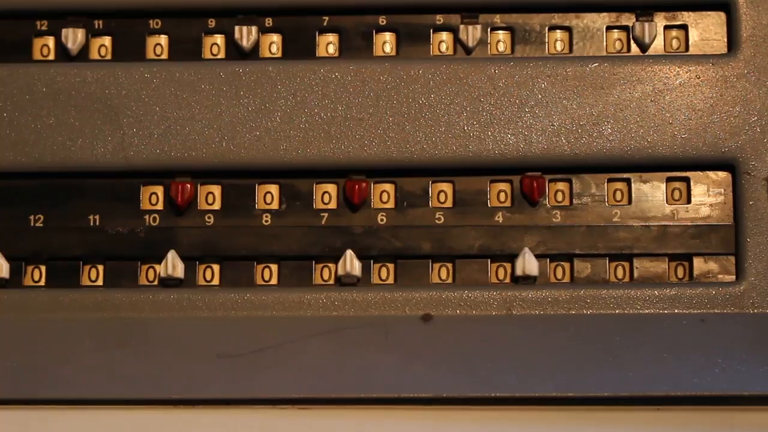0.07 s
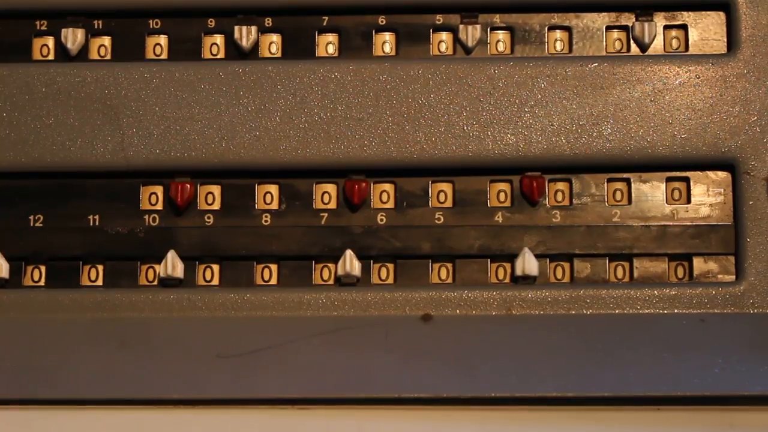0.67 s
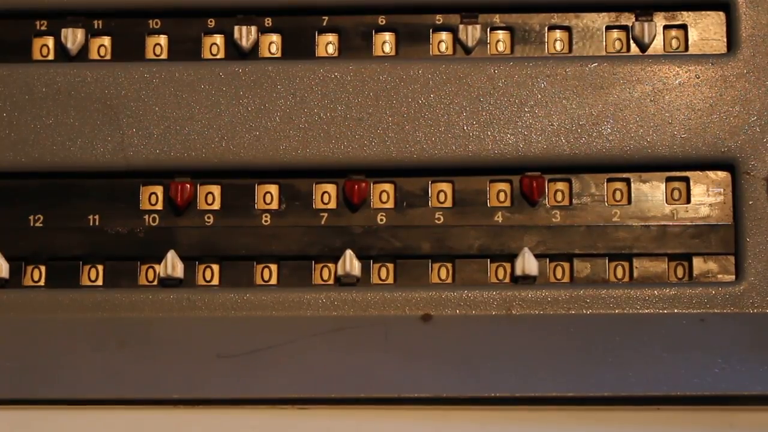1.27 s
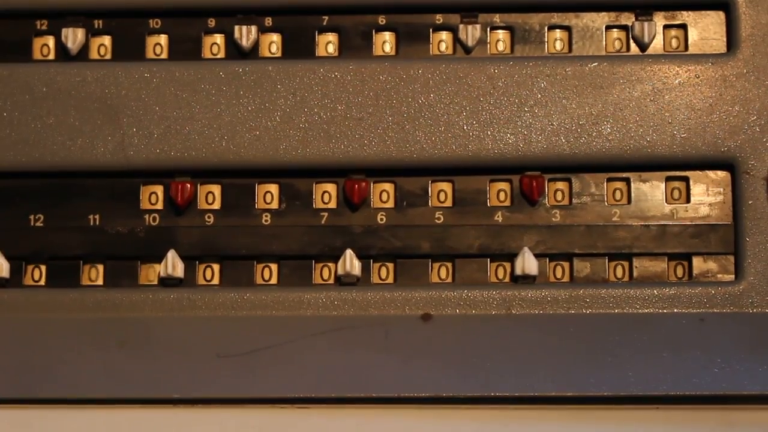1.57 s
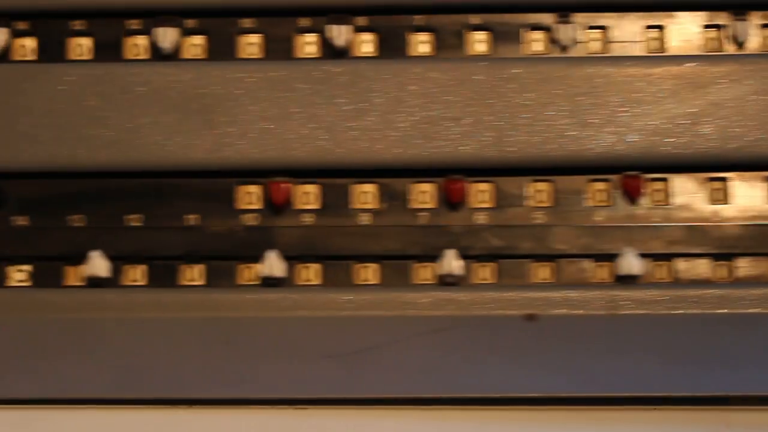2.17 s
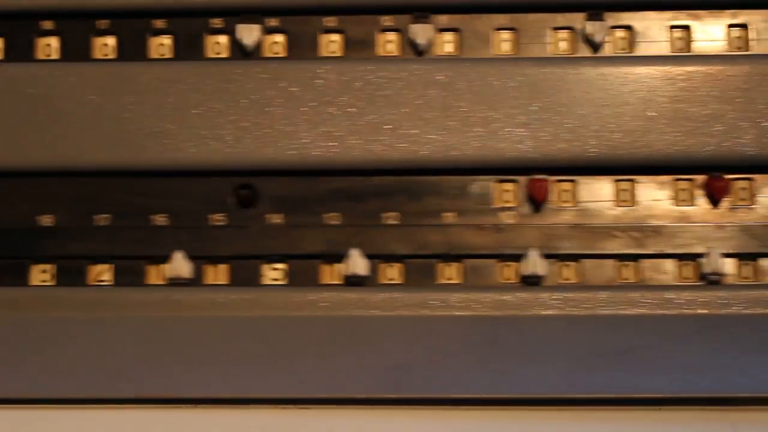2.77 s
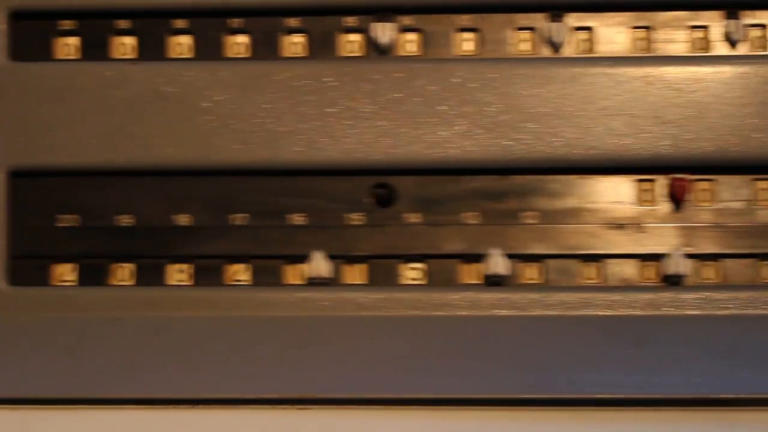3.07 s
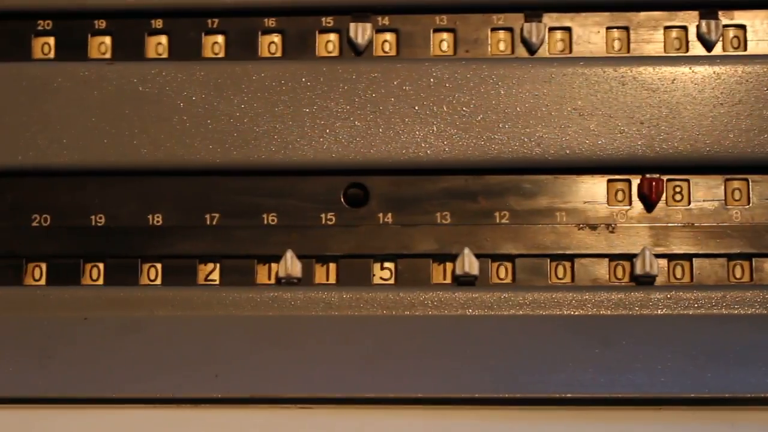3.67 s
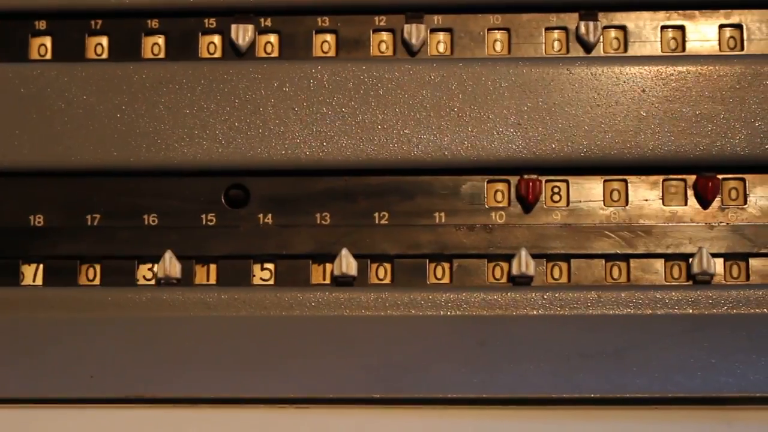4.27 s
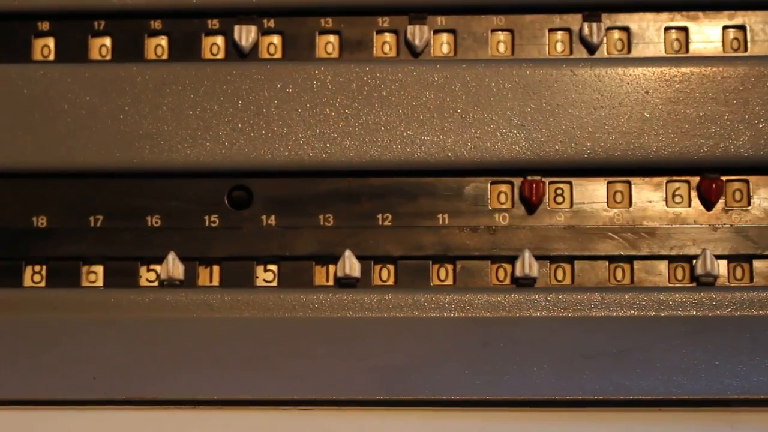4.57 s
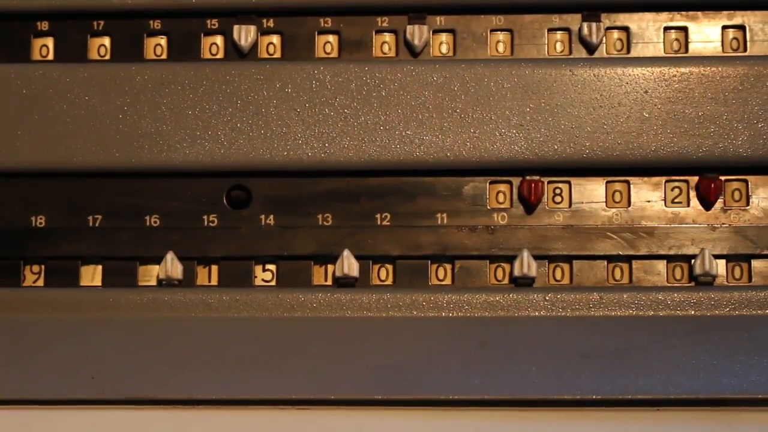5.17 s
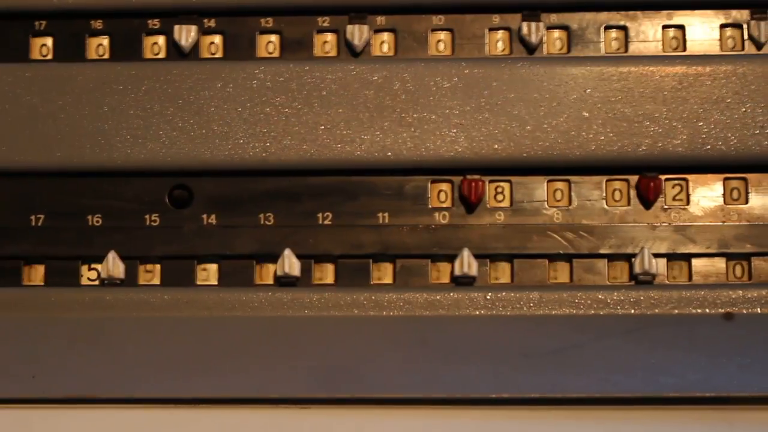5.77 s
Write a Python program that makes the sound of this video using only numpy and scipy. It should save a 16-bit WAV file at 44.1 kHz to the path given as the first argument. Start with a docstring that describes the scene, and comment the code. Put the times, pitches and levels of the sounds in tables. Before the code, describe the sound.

A mechanical calculator is heard close up on a desk in a small room. A key clicks softly at the very start, followed by a faint slide and low room noise. At about 1.3 seconds levers clack and the motor starts with a brief hum. Two short, loud bursts of slamming, rattling gears come at 1.6 and 1.9 seconds. From 2.3 to 3.2 seconds the carriage steps along with eight bright, evenly spaced metallic snaps over a low shudder. Three more short gear runs follow at about 3.2, 3.5 and 3.9 seconds, each opening with a slam and closing with a latching clack. From 4.1 to 5.5 seconds the machine clacks rapidly and regularly, seven or eight strokes a second, over a dense rattle that rings in its metal case. A last run starts at 5.6 seconds and continues to the end, around 6 seconds.

```python
"""A motor-driven mechanical calculator, heard close by on a desk in a small room.
A key clicks, the motor starts, the dials clear, the carriage steps along on its pawl, a division runs.
Each run of the adding gear opens with a slam, strikes and rattles once per shaft turn and ends on a latch.
Impacts are decaying noise bursts shaped by resonances; levers, gears and motor excite the modes of the
metal case, and the room adds its reverberation."""
import sys
import numpy as np
from scipy import signal
from scipy.fft import rfft, irfft
from scipy.io import wavfile

SR = 44100
rng = np.random.default_rng(int(sys.argv[2]) if len(sys.argv) > 2 else 0)


def int16_out(signal):
    """Quantize to a 16-bit WAV file."""
    q = np.round(np.clip(np.atleast_2d(signal).T, -1, 1) * 32767)
    wavfile.write(sys.argv[1], SR, q.astype(np.int16))


N = 261954
TIME = np.arange(N) / SR
TURN_S, TURN_START_S = .1325, 4.139  # period and phase origin of the main shaft
MOTOR_ON_S, GEARS_ON_S = 1.288, 1.43

# envelope of the motor pulling up to speed: t/s, relative level/dB
MOTOR_SURGE = [(1.43, -65), (1.465, -34), (1.505, -30.5), (1.58, -44.5), (1.7, -50), (5.94, -55)]
# runs of the adding gear, levels relative: clutch in t/s, clutch out t/s, slam level/dB, its thud/dB,
# its snap/dB, its chatter decay/s, stroke level/dB, latch lead/s, gear rattle/dB, frame shake/dB
GEAR_RUNS = [(1.622, 1.755, -1.5, 8.5, -6, 0.021, -3, .011, -21.5, -27),
             (1.878, 2.014, -3.5, 12, 0, 0.059, -8, 0.025, -22.5, -29),
             (3.197, 3.342, -2, 2.5, 1, 0.063, -7.5, .028, -24, -28.5),
             (3.475, 3.735, -3, 0, 1.5, 0.011, -8, .021, -22, -25.5),
             (3.874, 4.008, -4.5, 6, 3, 0.046, -8, .024, -23, -29),
             (4.138, 5.467, -4, 5, 6, 0.0089, -6.5, .025, -25.5, -31),
             (5.599, 6.005, -5.5, 4.5, 0, 0.091, -11.5, .025, -22, -29)]
# the carriage pawl dropping into each notch: t/s, relative level/dB, main ring f/Hz
PAWL_DROPS = [(2.273, -8.5, 5160), (2.405, -7.5, 5060), (2.535, -5.5, 5530), (2.669, -5, 4770),
              (2.8018, -4, 5540), (2.9342, -6, 5070), (3.064, -3.5, 5630), (3.195, -4.5, 5400)]


def amp(db):
    """Amplitude ratio of a level in decibels."""
    return 10 ** (np.asarray(db) / 20)


def unit_rms(x):
    """Normalisation to unit mean power."""
    return x / np.sqrt(np.mean(x ** 2) + 1e-20)


def at_frequency(points, hz):
    """Interpolation on a logarithmic frequency axis."""
    f, value = np.transpose(points)
    return np.interp(np.log(hz + 1), np.log(f + 1), value)


def envelope(curve):
    """Piecewise exponential gain through rows of t/s, level/dB; silent before the first."""
    s, db = np.transpose(curve)
    return amp(np.interp(TIME, s, db, left=-120))


def held(start, stop, rise_s, fall_s):
    """Exponential build-up from start and exponential decay from stop."""
    return (1 - np.exp(-np.maximum(TIME - start, 0) / rise_s)) * np.exp(-np.maximum(TIME - stop, 0) / fall_s)


def swell(depth_db, peak_turn):
    """Periodic modulation: the load rises once per shaft turn."""
    return amp(depth_db * np.cos(np.pi * ((TIME - TURN_START_S) / TURN_S - peak_turn)) ** 8)


def power_sum(parts):
    """Incoherent addition: unrelated sounds add in power."""
    return np.sqrt(sum(part ** 2 for part in parts))


def add(mix, s, sound):
    """Superposition of a sound on the mix from time s."""
    part = mix[:, max(round(s * SR), 0):][:, :sound.shape[1]]
    part += sound[:, :part.shape[1]]


def colour(x, spectrum, modes=(), size=8192):
    """Minimum-phase filter of unit power: a smooth spectrum with resonance peaks on it."""
    hz = abs(np.fft.fftfreq(size, 1 / SR))
    peaks_db = sum(peak / (1 + (2 * (hz - f) / width) ** 2) for f, width, peak in modes)
    log_gain = np.log(amp(at_frequency(spectrum, hz) + peaks_db))
    response = np.fft.ifft(np.exp(np.conj(signal.hilbert(log_gain)))).real[:size // 2]
    return signal.fftconvolve(x, response[None] / np.linalg.norm(response), axes=1)[:, :x.shape[1]]


def contacts(per_s, spread_db, size):
    """Poisson train of tiny impacts, most light and a few hard."""
    force = amp(spread_db * np.minimum(rng.exponential(1, size), 4)) * rng.choice([-1, 1], size)
    return force * (rng.random(size) < per_s / SR)


def clatter(per_s, spread_db, decay_s, size):
    """Loose steel parts, mid and side: the energy of each contact decays exponentially as noise."""
    energy = signal.lfilter([1], [1, -np.exp(-2 / (decay_s * SR))], contacts(per_s, spread_db, size) ** 2)
    return unit_rms(np.sqrt(energy) * rng.standard_normal((2, size)))


def strike(decay_s, bounce_s, bounce_db, size=8192):
    """Inelastic impact: a damped noise burst and its weaker rebound."""
    t = TIME[:size]
    rebound = amp(bounce_db) * (t > bounce_s) * np.exp(-abs(t - bounce_s) / decay_s)
    return (np.exp(-t / decay_s) + rebound) * rng.standard_normal((2, size))


def air(gain_db=-55.5):
    """Stationary background noise, strongest in the bass."""
    # ambient spectrum: f/Hz, relative level/dB
    spectrum = [(15, -14), (25, -30), (49, 0.5), (72, -11), (104, 0.5), (135, -6), (223, -10), (263, -4.5),
                (326, -13), (754, -10.5), (1440, -17.5), (7000, -25), (16000, -35.5)]
    return amp(gain_db) * colour(rng.standard_normal((2, N)), spectrum)


def key(gain_db=-4, slide_db=-2, decay_s=0.0019, size=2048):
    """Impact and friction: a key clicks down and latches, then something slides faintly."""
    # key impacts: t/s, relative level/dB
    clicks = [(0.038, -39), (0.041, -30.5), (0.0817, -21.5), (0.085, -26), (.100, -30), (0.105, -25)]
    # sliding touch: t/s, relative level/dB
    slide = [(.43, -80), (.455, -50.5), (.49, -57), (.55, -69), (.6, -90)]
    # spectrum of both: f/Hz, relative level/dB
    spectrum = [(100, -23), (700, -5.5), (1800, -3.5), (3100, -1), (4200, -7.5), (5500, -16), (9000, -33),
                (16000, -50)]
    out = amp(slide_db) * envelope(slide) * rng.standard_normal((2, N))
    for s, db in clicks:
        add(out, s, amp(db + gain_db) * rng.standard_normal((2, size)) * np.exp(-TIME[:size] / decay_s))
    return colour(out, spectrum)


def shake_level(idle_db=-36, travel_db=-27, surge_db=10, travel_lead_s=0.2, fall_s=0.048):
    """Forced vibration: the frame shakes with the motor's load in spin-up, carriage travel and runs."""
    idle = amp(idle_db) * held(MOTOR_ON_S, TIME[-1], rise_s=0.08, fall_s=fall_s)
    travel_start, travel_stop = PAWL_DROPS[0][0] - travel_lead_s, PAWL_DROPS[-1][0]
    travel = amp(travel_db) * held(travel_start, travel_stop, rise_s=0.29, fall_s=fall_s)
    runs = [amp(db) * held(start, stop, rise_s=0.016, fall_s=fall_s) for start, stop, *_, db in GEAR_RUNS]
    return power_sum([idle, travel, amp(surge_db) * envelope(MOTOR_SURGE)] + runs)


def drive(gain_db=-3, hum_db=-2, hum_hz=102):
    """Structure-borne sound: the motor hums and its train knocks dully against the frame."""
    # spectrum of the knocks: f/Hz, relative level/dB
    spectrum = [(25, -39), (65, -18.5), (100, -3.5), (145, -1), (350, -3.5), (650, -8), (1100, -10.5),
                (2500, -12.5), (6000, -12.5), (16000, -86)]
    # drive train resonances: f/Hz, bandwidth/Hz, peak/dB
    whirr = [(117, 23, 3), (177, 24, 2), (1054, 194, 5.5), (2540, 450, 7)]
    load = unit_rms(swell(depth_db=3.5, peak_turn=0.029))
    knocks = clatter(per_s=1000, spread_db=2.5, decay_s=0.0043, size=N) * load
    frame = colour(knocks * shake_level(), spectrum, whirr)
    hum = envelope(MOTOR_SURGE) * np.sqrt(2) * np.sin(2 * np.pi * hum_hz * TIME)
    return amp(gain_db) * frame + amp(hum_db) * np.array([hum, np.zeros(N)])


def lever_blows(slam_ring_hz=2270, ring_scatter=.16):
    """Impact sequence: control levers, and in each run a slam, a stroke per turn, a latch and a stop."""
    # control levers: t/s, relative level/dB, thud/dB, snap/dB, ring f/Hz, chatter decay/s
    controls = [(1.310, -32.5, 11, -34, 1730, 0.079), (1.351, -16, 6.5, -3, 1600, .034),
                (1.432, -18.5, -12, -8, 2400, 0.041), (1.451, -12.5, 5, -2, 2200, 0.039),
                (1.49, -11, 5, 11, 2500, 0.013), (2.122, -6.5, 6, 2, 3400, 0.017),
                (3.420, -6, 7.5, 3, 2800, 0.0088), (3.432, -10, 7, 3, 2200, 0.0068),
                (3.845, -7, 1, -2, 2340, 0.0042), (4.097, -12.5, -5, 3, 2300, .006),
                (5.570, -17, -8, -2, 2200, .006)]
    # levers of a run: level re its strokes/dB, thud/dB, snap/dB, ring f/Hz, chatter decay/s
    stroke = (1.5, 0, -4, 2900, 0.02)
    latch = (-2, 4.5, -4, 2100, 0)
    end_stop = (0, 0.5, 3.5, 2700, -0.02)
    blows = list(controls)
    for start, stop, slam_db, thud_db, snap_db, chatter_s, stroke_db, latch_lead_s, _, _ in GEAR_RUNS:
        blows.append((start, slam_db, thud_db, snap_db, slam_ring_hz, chatter_s))
        turns = np.linspace(start, stop, round((stop - start) / TURN_S) + 1)
        strikes = [(s, stroke) for s in turns[1:-1]] + [(stop - latch_lead_s, latch), (stop, end_stop)]
        for s, (db, thud_db, snap_db, ring_hz, chatter_s) in strikes:
            detune = np.exp(ring_scatter * rng.standard_normal())
            blows.append((s, stroke_db + db, thud_db, snap_db, ring_hz * detune, chatter_s))
    return blows


def levers(gain_db=-7, chatter_db=-7, thud_hz=600, snap_hz=7500, size=8192):
    """Impact excitation: each lever hits its stop, rings, rebounds and sets its neighbours chattering."""
    # spectrum of a blow: f/Hz, relative level/dB
    spectrum = [(40, -45), (150, -8), (500, -5), (900, -3), (1800, -2), (3300, 3), (4400, -0.5),
                (5800, -1.5), (8000, -4), (12000, -10.5), (16000, -22.5)]
    out = np.zeros((2, N))
    for s, db, thud_db, snap_db, ring_hz, chatter_s in lever_blows():
        hit = strike(decay_s=.006, bounce_s=.01 * rng.uniform(.8, 1.2), bounce_db=-8)
        fade = np.exp(-TIME[:size] / max(chatter_s, .002))
        chatter = clatter(per_s=900, spread_db=0.67, decay_s=0.0019, size=size) * fade
        # f/Hz, bandwidth/Hz, peak/dB
        modes = [(thud_hz, 500, thud_db), (ring_hz, 900, 4), (snap_hz, 8000, snap_db)]
        add(out, s, amp(db + gain_db) * colour(hit + amp(chatter_db) * chatter, spectrum, modes))
    return out


def rattle_level(idle_db=-38, shift_db=-28.5, surge_db=4, build_db=4, shift_turns=1.13):
    """Power sum of rattles: idling, spin-up, a build-up in each turn of a run, then the carriage shift."""
    rise_s, fall_s = .012, .028
    parts = [amp(idle_db) * held(GEARS_ON_S, TIME[-1], rise_s, fall_s),
             amp(surge_db) * envelope(MOTOR_SURGE)]
    for start, stop, *_, rattle_db, _ in GEAR_RUNS:
        turn = (TIME - start) / TURN_S % 1
        parts.append(amp(rattle_db + build_db * (turn - .5)) * held(start, stop, rise_s, fall_s))
        parts.append(amp(shift_db) * held(stop, stop + shift_turns * TURN_S, rise_s, fall_s))
    return power_sum(parts)


def gears(gain_db=0.5, tooth_depth=0.11, teeth=15):
    """Amplitude modulation: the dense ticking of teeth and detents pulses at the meshing rate."""
    # spectrum of the rattle: f/Hz, relative level/dB
    spectrum = [(60, -50), (300, -4), (600, -6), (900, -1), (1800, -1.5), (3500, 2.5), (4400, -0.5),
                (5700, -1.5), (8200, -4), (12000, -12.5), (16000, -22.5)]
    meshing = 1 + tooth_depth * np.cos(2 * np.pi * teeth * TIME / TURN_S)
    load = unit_rms(meshing * swell(depth_db=0.5, peak_turn=0.71))
    ticks = clatter(per_s=1300, spread_db=1.0, decay_s=0.0064, size=N)
    return amp(gain_db) * colour(ticks * load * rattle_level(), spectrum)


def links(gain_db=-7, low_hz=1450, high_hz=3700, ring_s=0.0045, count=16, size=2048):
    """Damped oscillators: slack links knock and ring, hardest as the stroke turns over."""
    t, out = TIME[:size], np.zeros((2, N))
    for hz in np.geomspace(low_hz, high_hz, count):
        ring = np.exp(-t / ring_s) * np.sin(2 * np.pi * (hz * t + rng.random((2, 1))))
        knocks = contacts(per_s=14, spread_db=2.4, size=N)
        out += signal.oaconvolve(knocks[None], ring, axes=1)[:, :N]
    load = unit_rms(swell(depth_db=6.5, peak_turn=0.026))
    return amp(gain_db) * unit_rms(out) * load * rattle_level()


def spring(s=1.432, db=-44, hz=13950, decay_s=.03, size=8192):
    """Free vibration of one mode: a small spring pings as the gears start to turn."""
    out, t = np.zeros((2, N)), TIME[:size]
    add(out, s, amp(db) * np.exp(-t / decay_s) * np.sin(2 * np.pi * (hz * t + rng.random((2, 1)))))
    return out


def carriage(gain_db=-7, ring_width_hz=1300, ring_db=9, chatter_db=-11, chatter_s=0.046, size=8192):
    """Impact and resonance: the pawl snaps brightly into each notch and the carriage shudders to rest."""
    # spectrum of the snap: f/Hz, relative level/dB
    spectrum = [(100, -5), (1000, -7), (2400, 13), (3500, 8.5), (5500, 13.5), (7200, 6.5), (10000, 0.5),
                (16000, -11)]
    # resonances of pawl and rack: f/Hz, bandwidth/Hz, peak/dB
    modes = [(2420, 310, 4), (8240, 1000, 9)]
    out, fade = np.zeros((2, N)), np.exp(-TIME[:size] / chatter_s)
    for s, db, hz in PAWL_DROPS:
        hit = strike(decay_s=.0036, bounce_s=.0095 * rng.uniform(.85, 1.15), bounce_db=-12)
        ring = colour(hit, spectrum, modes + [(hz, ring_width_hz, ring_db)])
        chatter = clatter(per_s=1100, spread_db=1.2, decay_s=0.0016, size=size) * fade
        add(out, s, amp(db + gain_db) * (ring + amp(chatter_db) * colour(chatter, spectrum, modes)))
    return out


def room(x, delay_s=0.005, count=3):
    """Reverberation: each band decays at its own rate; tails crossfade in a steady cycle to smooth it."""
    # reverberation time: f/Hz, T60/s
    t60 = [(150, 0.32), (600, 0.44), (3500, 0.38), (9000, 0.31), (16000, 0.98)]
    out = np.zeros((2, N))
    for k in range(count):
        hz, t, noise = signal.stft(rng.standard_normal((2, SR // 2)), SR, nperseg=256)
        decay = amp(-60 * t / at_frequency(t60, hz)[:, None])
        tail = signal.istft(noise * decay, SR, nperseg=256)[1]
        tail *= np.clip(TIME[:tail.shape[1]] / delay_s - 1, 0, 1)
        share = np.sqrt(2 / count) * np.cos(np.pi * (TIME / (2 * TURN_S) + k / count))
        out += signal.fftconvolve(x * share, tail / np.linalg.norm(tail[0]), axes=1)[:, :N]
    return out


def metal_case(x):
    """Modal filtering: the case and its panels ring at their natural frequencies."""
    # case resonances: f/Hz, bandwidth/Hz, peak/dB
    modes = [(174, 38, 8), (232, 38, 8), (285, 9.8, -4), (352.3, 68, 9), (475, 48, 8), (585.6, 23, 5.5),
             (624, 92, 5), (711, 120, 5), (903, 25, 0), (1041.5, 51, 7.5), (1092, 38, 3), (1252, 22, -12.5),
             (1300, 200, 4), (1520, 66, 2.5), (1557, 47, 3), (1684, 47, 7.5), (2150, 117, 6), (2500, 26, 3),
             (3320, 180, 1)]
    return colour(x, [(20, 0), (20000, 0)], modes)


def scene(blow_room_db=-4, pawl_room_db=-5.5, run_room_db=-7, key_room_db=-17, left_db=-2, right_db=0.1):
    """Direct and reverberant sound superpose in mid and side; sum and difference give left and right."""
    # stereo width: f/Hz, side gain/dB
    width = [(60, 0), (110, -40), (200, -51), (380, -17), (700, -14), (1290, -9.5), (2380, -6), (4400, -4),
             (8120, -2), (15000, 0.5)]
    blows, pawl = levers() + spring(), carriage()
    running, keys = gears() + links() + drive(), key()
    direct = np.array([[1], [amp(-2)]])  # the direct sound is narrower than the room
    works = direct * (blows + running) + room(amp(blow_room_db) * blows + amp(run_room_db) * running)
    outside = direct * (pawl + keys) + room(amp(pawl_room_db) * pawl + amp(key_room_db) * keys)
    mid, side = metal_case(works) + outside + air()
    side_gain = amp(at_frequency(width, np.fft.rfftfreq(N, 1 / SR)))
    side = irfft(rfft(side) * side_gain, N)
    return np.array([amp(left_db) * (mid + side), amp(right_db) * (mid - side)])


def record(dry, low_cut_hz=32, high_cut_hz=16000):
    """Band limiting and clipping: the deepest bass is lost, peaks stop at full scale, the top is cut."""
    heard = signal.sosfilt(signal.butter(2, low_cut_hz, "high", fs=SR, output="sos"), dry)
    lowpass = signal.firwin(511, high_cut_hz, window=("kaiser", 9), fs=SR)
    return signal.oaconvolve(np.clip(heard, -1, 1), lowpass[None], "same", axes=1)


dry = scene()
out = record(dry)
int16_out(out)
```